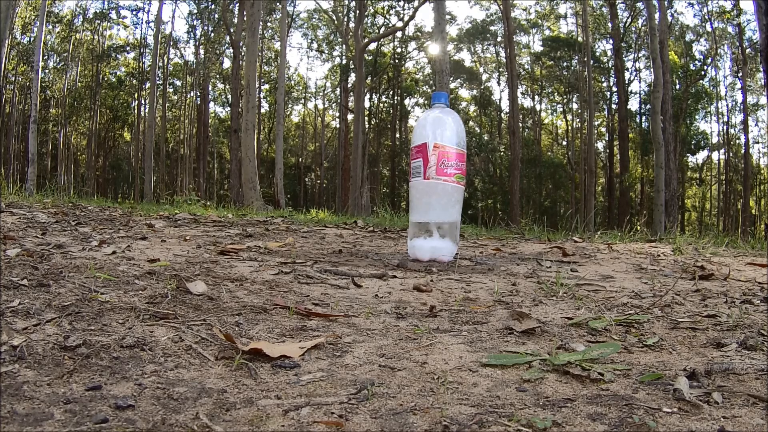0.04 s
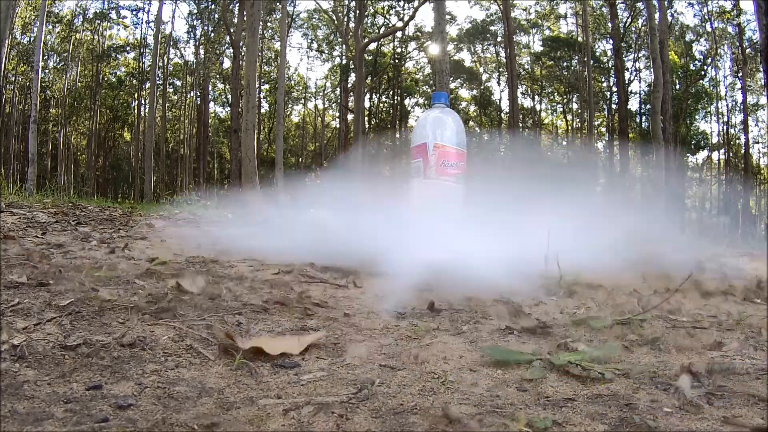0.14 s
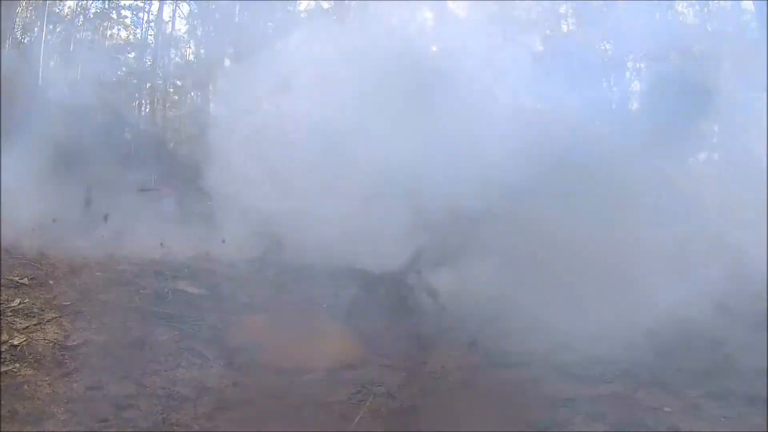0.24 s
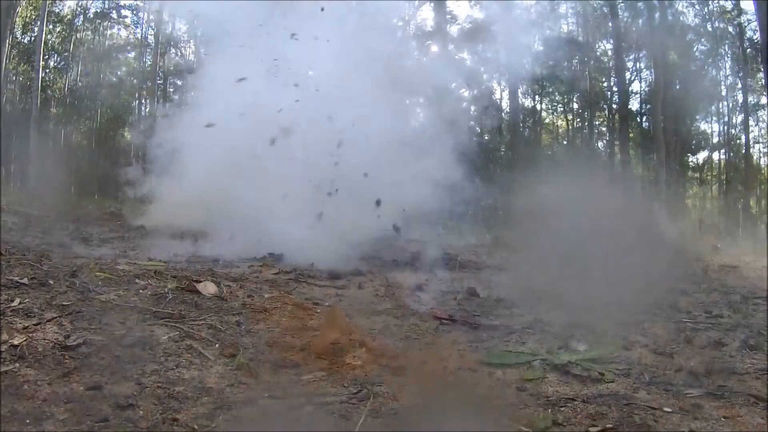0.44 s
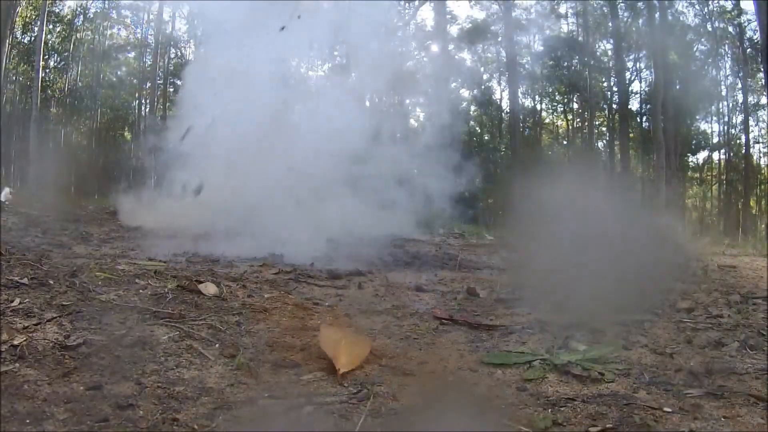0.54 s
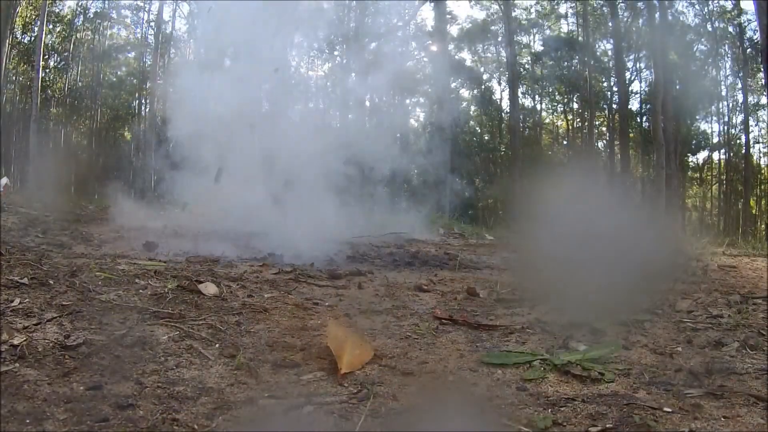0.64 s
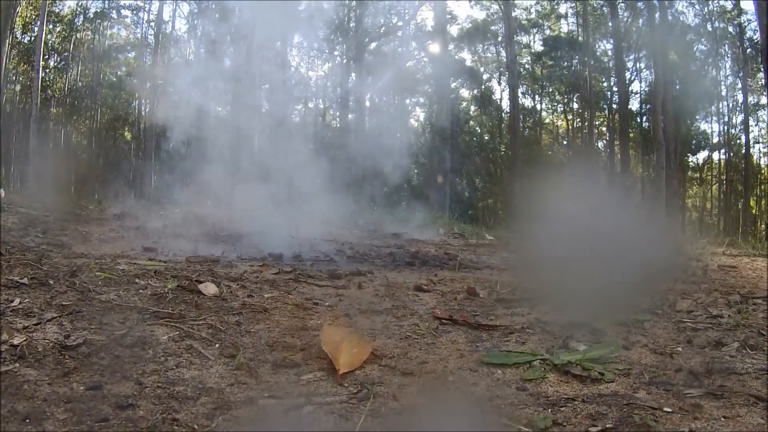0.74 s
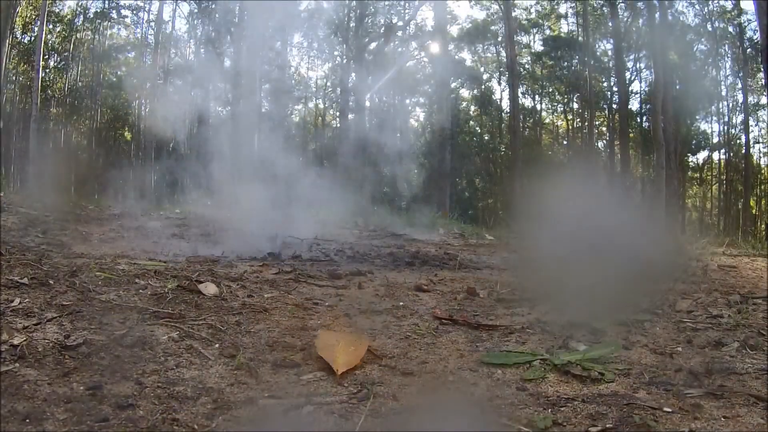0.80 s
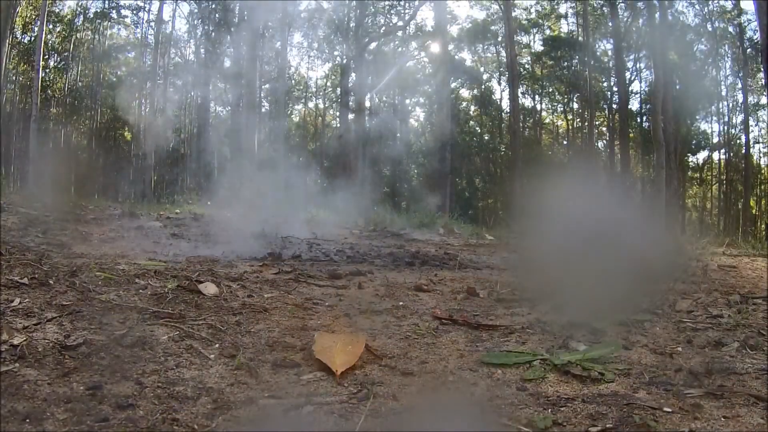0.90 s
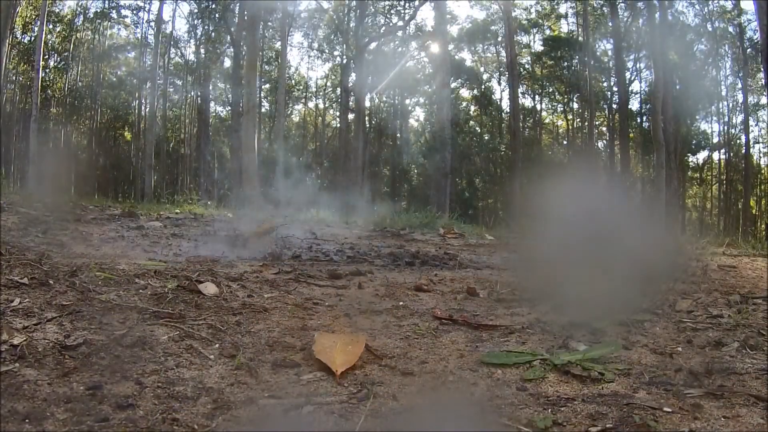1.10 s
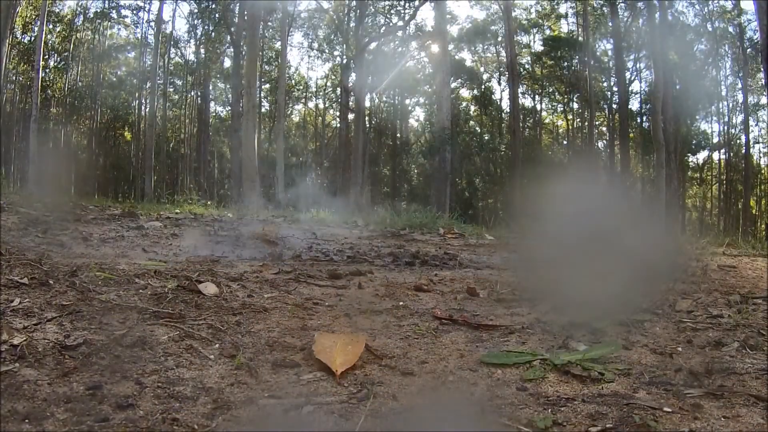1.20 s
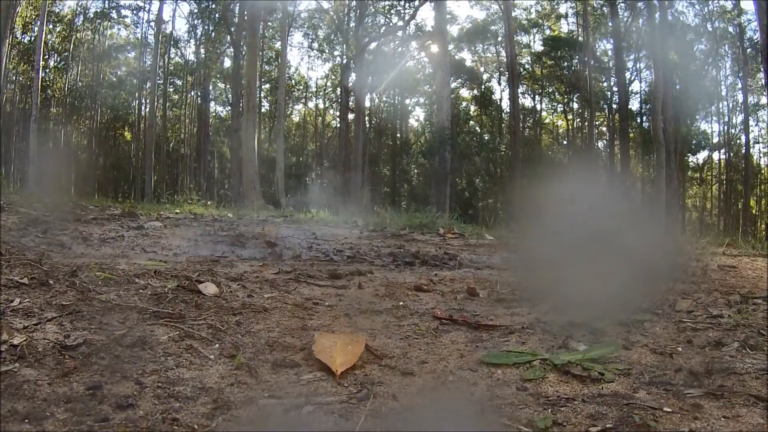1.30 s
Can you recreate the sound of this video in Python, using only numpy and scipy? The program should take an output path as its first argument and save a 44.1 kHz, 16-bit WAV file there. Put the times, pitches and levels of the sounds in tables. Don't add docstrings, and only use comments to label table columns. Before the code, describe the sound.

A plastic bottle explodes with a sharp overloaded bang outdoors, then echo and falling grit ticks

```python
import sys
import numpy as np
from scipy import signal
from scipy.fft import rfft, irfft
from scipy.io import wavfile
from scipy.ndimage import uniform_filter1d

SR = 44100
rng = np.random.default_rng(int(sys.argv[2]) if len(sys.argv) > 2 else 0)


def elevation(decibels):
    levels = np.asarray(decibels, float)
    return 10 ** (levels / 20)


def wrap_up_sound(samples):
    columns = np.atleast_2d(samples).T
    tamed = np.clip(columns, -1, 1)
    steps = np.round(tamed * 32767).astype(np.int16)
    wavfile.write(sys.argv[1], SR, steps)


N = 59535
BURST_S = 0.2486
GRAIN = 1024


def level(x, db):
    return x * elevation(db) / np.sqrt(np.mean(x ** 2))


def peak(x):
    return x / np.abs(x).max()


def lowpass(x, hz):
    return signal.lfilter(*signal.butter(2, hz, fs=SR), x)


def band(x, hz, width):
    hz = min(hz, 0.45 * SR)
    return signal.lfilter(*signal.iirpeak(hz, hz / width, fs=SR), x)


def ring(t, hz, t60):
    decay = np.exp(-np.log(1000) * np.maximum(t, 0) / t60)
    return np.sin(2 * np.pi * hz * t) * decay * (t > 0)


def walk(rate):
    hold = int(SR / rate)
    steps = np.repeat(rng.standard_normal(N // hold + 1), hold)
    return 1.24 * uniform_filter1d(uniform_filter1d(steps, hold), hold)[:N]


def bands(colour, flicker_db, tilt_db=0):
    hz, db = np.array(colour).T
    octave = np.log2(np.arange(N // 2 + 1) * SR / N + 1)
    whole = rfft(rng.standard_normal(N)) * elevation(np.interp(octave, np.log2(hz), db))
    out = 0
    for centre in np.arange(4, 14.6, 0.5):
        window = np.cos(np.pi * np.clip(octave - centre, -0.5, 0.5)) ** 2
        above_2k = max(centre - np.log2(2000), 0)
        out = out + irfft(whole * window, N) * elevation(flicker_db * walk(24.85) + tilt_db * above_2k)
    return out


def add(out, when, sound, db):
    i = int(when * SR)
    out[i:i + len(sound)] += (peak(sound) * elevation(db))[:N - i]


# (frequency [Hz], density [dB per Hz])
FOREST_COLOUR = [(25, -14.5), (60, -18), (160, -15), (320, -19), (1000, -27), (3400, -33), (15500, -47.5)]


def forest(t):
    return level(bands(FOREST_COLOUR, 1.6), -59) * elevation(-6 * (t > BURST_S))


# (time [s], length [s], pitch [Hz], level [dB])
PUFFS = [(.222, 0.0046, 3740, -61), (.2612, 0.0016, 5560, -24), (0.283, 0.0061, 386, -34),
         (0.336, 0.023, 40, -51), (0.395, 0.016, 38.4, -43.5), (0.43, 0.052, 330, -39),
         (0.407, 0.03, 1560, -37.5), (0.611, 0.006, 1140, -42), (.57, .03, 95, -52), (.67, .02, 70, -55),
         (.9, .07, 95, -64), (1.24, .02, 60, -63), (1.155, 0.01, 59.6, -58), (1.32, 0.043, 100, -59)]


def puffs(t):
    out = 0
    for when, length, hz, db in PUFFS:
        noise = band(band(rng.standard_normal(N), hz, hz), hz, hz * 0.5)
        out = out + level(noise, db) * np.exp(-((t - when) / length) ** 2)
    return out


# (frequency [Hz], level [dB], t60 [s])
BLAST_MODES = [(183.4, -7.5, 0.03), (590, -4, 0.022), (978, 0.5, 0.012), (1548.7, -5.5, 0.023),
               (2264.5, -5, 0.021), (2830, -4, 0.0081), (3700, -1, 0.011), (4230, 3, 0.012)]
# (frequency [Hz], level [dB], t60 [s])
LONG_RINGS = [(273.2, -28.5, 0.21), (392.5, -33, 0.16), (1797, -29, 0.6), (1845, -41, 0.3)]


def blast(t):
    BLAST_DB, OVERLOAD_S = 19.5, 0.0048
    BITE_DB, BITE_S = -27, 0.0012
    s = t - BURST_S
    tear = level(band(rng.standard_normal(N), 2520, 4140), -6)
    wave = tear * (s > 0) * np.exp(-np.maximum(s, 0) / 0.0039)
    swell = np.clip(0.17 + s / 0.0012, 0, 1)
    for hz, db, t60 in BLAST_MODES:
        wave = wave - elevation(db) * ring(s, hz, t60) * (swell if hz < 3000 else 1)
    wave = wave + elevation(-4) * ring(s - 0.0026, 2350, 0.014)
    bite = BITE_DB * (1 - np.exp(-np.maximum(s - OVERLOAD_S, 0) / BITE_S))
    capsule = lowpass(1.02 * np.tanh(wave * elevation(BLAST_DB + bite)), 7100)
    return capsule + sum(elevation(db) * ring(s, hz, t60) for hz, db, t60 in LONG_RINGS)


# (frequency [Hz], width [Hz], level [dB])
HOUSING = [(406, 360, 0), (1097, 124, 2), (1546, 300, -1), (2108, 326, 5.5), (2840, 194, -2),
           (3400, 300, -4), (4540, 900, -40)]


def housing(x, narrow=0.8):
    out = 0
    for k, (hz, width, db) in enumerate(HOUSING):
        out = out + (-1) ** k * elevation(db) * band(x, hz, width * narrow)
    return out


def patter(t):
    HITS_PER_S, HIT_S = 350, 0.0009
    SCATTER_DB, SCATTER_CAP_DB = 5, 12
    GROWS_DB_PER_S, LEVEL_AT_3_S_DB, LEAF_DB = 10, -40, -9
    chance = rng.random((2, N))
    scatter = np.minimum(-SCATTER_DB * np.log(chance[1] + 1e-9), SCATTER_CAP_DB)
    size = elevation(scatter + LEVEL_AT_3_S_DB + GROWS_DB_PER_S * (t - 3))
    hits = (chance[0] < HITS_PER_S / SR) * size * (t > BURST_S)
    envelope = signal.lfilter([1], [1, -np.exp(-1 / (HIT_S * SR))], hits)
    grit = rng.standard_normal(N) * envelope
    leaves = band(band(grit, 6500, 8000), 6500, 8000)
    return elevation(LEAF_DB) * leaves + housing(grit, 0.55)


# (time [s], level [dB], brightness above 2 kHz [dB per octave])
ECHO = [(0.253, -45, -12), (.2565, -22.5, -9), (.262, -30, 6), (0.269, -33.5, 6.5), (.285, -40.5, 6),
        (.3, -50, 7), (0.311, -35, 2.5), (.35, -38.5, 4.5), (0.412, -32, 2.5), (.5, -37, 2), (.66, -41, -1),
        (.9, -44.5, -5), (1.1, -46, -7), (1.35, -46.5, -1.5)]
# (frequency [Hz], density [dB per Hz])
ECHO_COLOUR = [(40, -25.5), (90, -15), (300, -7), (540, -9), (740, -16), (1260, -12), (1750, -4),
               (2500, -9), (7200, -24), (8000, -33), (15500, -50.5)]


def echo(t):
    when, db, tilt = np.array(ECHO).T
    air = bands(ECHO_COLOUR, 1.7, np.interp(t, when, tilt))
    air = air / np.std(air[N // 2:])
    boxed = housing(air)
    boxed = elevation(-8) * boxed / np.std(boxed[N // 2:])
    return (air + boxed) * elevation(np.interp(t, when, db)) * (t > when[0])


# (time [s], peak level [dB], pitch [Hz], top end [dB])
SPRAY = [(0.2636, -20, 4300, -20), (0.2853, -24, 7700, -20), (0.3037, -10, 4360, -15),
         (0.335, -27, 9000, -5), (0.3667, -16, 4740, -12), (0.3777, -21, 3800, -10),
         (0.4709, -21, 5160, -18), (0.4942, -22.5, 7600, -16), (0.537, -30, 5020, -22.5),
         (0.5694, -27.5, 3890, -20), (0.6084, -42, 9300, -20.5), (0.648, -31.5, 4660, -14),
         (0.6736, -36, 5620, -6), (0.6929, -21, 4500, -26), (0.6965, -37, 9600, -3),
         (0.7344, -48, 9300, -10), (0.762, -44, 7000, -9), (0.7744, -52, 4060, 8), (0.8184, -46, 8000, -13),
         (0.8454, -44, 7000, -12), (0.853, -19, 3890, -4), (0.8716, -40, 4210, -17)]
# (time [s], peak level [dB], pitch [Hz], top end [dB])
FALL = [(0.8949, -31, 4540, -35), (0.902, -31.5, 4670, -17), (0.911, -44, 4530, -1),
        (0.9263, -20, 6600, -29), (0.9394, -42, 7500, -10), (0.9504, -40, 4380, -11),
        (0.9754, -45, 8000, -6), (1.0046, -26, 4280, -24), (1.0204, -46, 5500, -12),
        (1.0277, -40, 5970, -15), (1.0375, -27.5, 6050, -21), (1.045, -38, 5840, -5),
        (1.0604, -54, 4020, -16), (1.0688, -31.5, 4400, -18), (1.0782, -34, 4200, -18),
        (1.0935, -38, 6500, -18), (1.1112, -28.5, 7040, -17), (1.136, -41, 5520, -14),
        (1.1453, -30, 4130, -29), (1.1534, -42, 7000, -8), (1.1624, -36, 4970, -25),
        (1.189, -45, 8500, -10), (1.2316, -34, 5500, -18), (1.253, -39, 4040, 7), (1.28, -20, 4870, -14),
        (1.2964, -33, 5000, -16), (1.3111, -21.5, 6230, -20), (1.32, -31, 4800, -23),
        (1.3284, -27.5, 4800, -15), (1.3404, -27.5, 5000, -12), (1.0845, -42, 7500, -15),
        (1.1715, -44, 7000, -15), (1.1955, -40, 6000, -15), (1.2065, -45, 6500, -15),
        (1.2275, -42, 7000, -10), (1.29, -42, 6500, -15), (1.3165, -42, 9000, -3), (1.3455, -37, 5500, -13),
        (.7875, -48, 6500, -15)]


def ticks():
    def leaf(push, hz, spread):
        edges = [hz / spread, min(hz * spread, 0.45 * SR)]
        return peak(signal.lfilter(*signal.butter(3, edges, "band", fs=SR), push))

    out, s = np.zeros(N), np.arange(GRAIN) / SR
    decay = np.exp(-s / 0.0012) + elevation(-18) * np.exp(-s / 0.005)
    envelope = decay * np.minimum(s / 0.00031, 1)
    for when, db, hz, top_db in list(SPRAY) + list(FALL):
        noise = rng.standard_normal(GRAIN)
        push = (noise + 2 * np.sign(noise) * (s < 0.0004)) * envelope
        body = leaf(push, hz, 1.39)
        top = leaf(push, 11400, 1.45)
        add(out, when, body + elevation(top_db + 6) * top, db - 2)
    return out


# (time [s], peak level [dB], pitch of the dull part [Hz], upper modes [dB])
KNOCKS = [(0.3678, -19.5, 1900, -2), (0.4457, -17, 1870, -5), (0.4943, -21.5, 2010, 1),
          (0.5378, -24.5, 2000, -2), (0.6468, -22.5, 1960, -15), (0.7041, -21.5, 1870, -13.5),
          (0.7854, -29, 1810, -31), (0.851, -25.5, 2030, -15), (0.892, -32, 1390, -17),
          (0.9243, -25.5, 2200, -35), (1.0041, -25.5, 2140, 10), (1.0359, -31, 1220, -13.5),
          (1.0782, -27, 2160, -17), (1.0919, -25, 2300, -13), (1.11, -29, 2300, -22),
          (1.1442, -26, 1960, -9), (1.155, -37, 2080, -17), (1.1606, -33, 1430, -11),
          (1.1692, -39, 2030, -10), (1.1885, -30.5, 1720, -10), (1.1947, -28.5, 1800, -9),
          (1.2047, -33, 1730, -11), (1.2177, -40, 1440, -12), (1.2306, -26.5, 1930, -17),
          (1.278, -22.5, 2480, 17), (1.296, -23.5, 1695, -12.5), (1.3064, -30.5, 1600, -7),
          (1.3404, -30, 1690, -5)]


def knocks():
    def struck(push, hz):
        near = band(band(push, hz, hz * 0.38), hz, hz)
        return peak(housing(near, 0.49)) + elevation(-6.5) * peak(near)

    FIRST_KNOCK = (0.3, -22, 1696, -6)
    out, s = np.zeros(N), np.arange(GRAIN) / SR
    envelope = np.exp(-s / 0.0013) * np.minimum(s / 0.00039, 1)
    for when, db, hz, upper_db in list(KNOCKS) + [FIRST_KNOCK]:
        push = rng.standard_normal(GRAIN) * envelope
        sound = struck(push, hz) + elevation(upper_db + 13) * struck(push, 2790)
        add(out, when, lowpass(sound, 5000), db - 1.5)
    return out


# (time [s], peak level [dB], frequency [Hz], rise [s], t60 [s])
LUMPS = [(.4457, -4, 1900, .0019, .008), (.4454, -9, 3150, .0016, .008), (.4458, -20, 2821, .001, .04),
         (.4498, -14, 1700, .0011, .008), (.4464, -31, 6200, .001, .008), (.4455, -32, 4300, .0008, .01),
         (.4456, -20, 1350, .001, .008), (1.0783, -19, 2050, .001, .008), (1.0838, -34, 1650, .001, .012),
         (1.0924, -18, 2200, .0018, .01), (1.0926, -26, 3250, .0015, .011),
         (1.0942, -23, 1650, .0016, .013), (1.095, -34, 1200, .001, .015), (1.093, -42, 4500, 0.0011, .012),
         (1.2302, -16, 1800, .0013, .01), (1.2304, -29, 2856, .001, .018),
         (1.144, -34, 2830, 0.0012, 0.026), (.3672, -31, 2250, .001, .015), (.385, -38, 278, .04, .35),
         (.395, -34, 408, .05, .4), (.36, -42, 1625, .03, .3), (1.093, -44, 284, .01, .12)]


def lumps(t):
    out = 0
    for when, db, hz, rise, t60 in LUMPS:
        s = t - when
        swell = np.sin(np.pi / 2 * np.clip(s / rise, 0, 1)) ** 2
        out = out + 2 * elevation(db) * ring(s, hz, t60) * swell
    return out


def scene():
    t = np.arange(N) / SR
    mix = forest(t) + puffs(t) + blast(t) + patter(t) + echo(t) + ticks() + knocks() + lumps(t)
    return mix[None]


def low_pass(x):
    return signal.sosfilt(signal.butter(12, 16320, fs=SR, output="sos"), x)


def record(dry):
    top_cut = signal.butter(6, 15600, fs=SR, output="sos")
    mix = dry
    for _ in range(2):
        mix = signal.sosfiltfilt(top_cut, np.clip(mix, -0.97, 0.97))
    return low_pass(mix)


dry = scene()
out = record(dry)
wrap_up_sound(out)
```